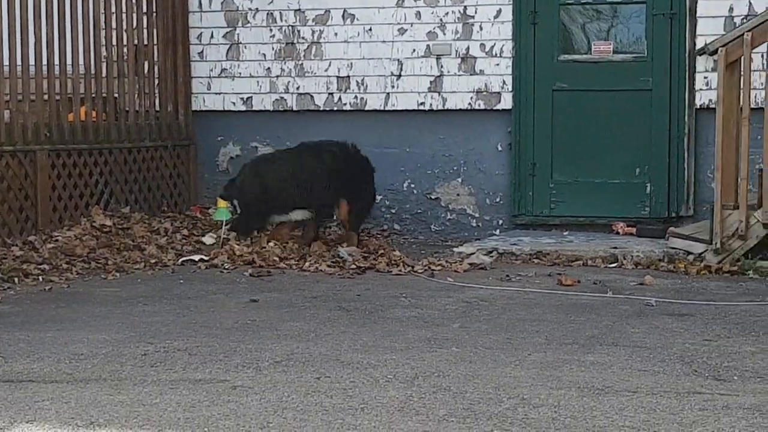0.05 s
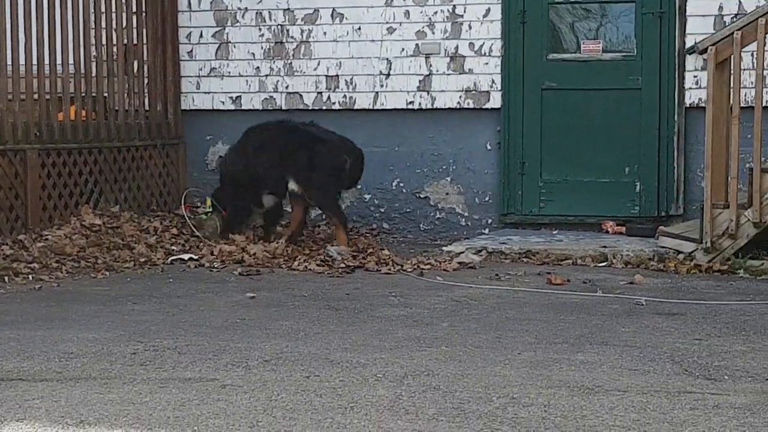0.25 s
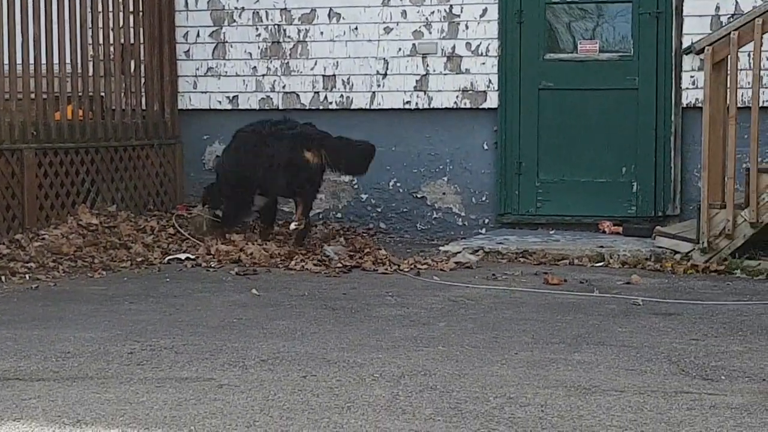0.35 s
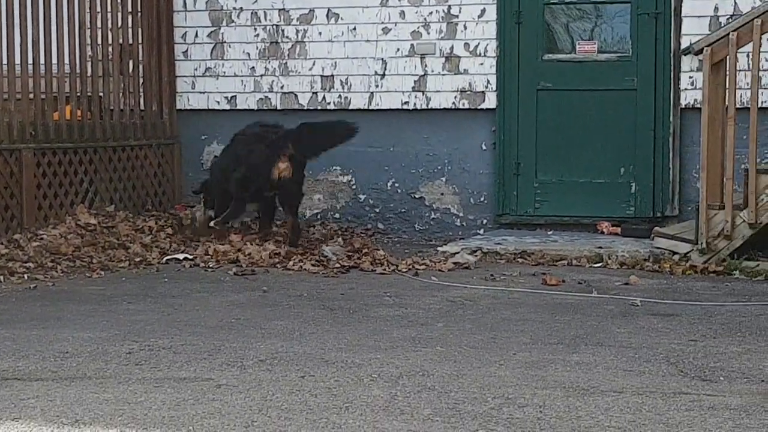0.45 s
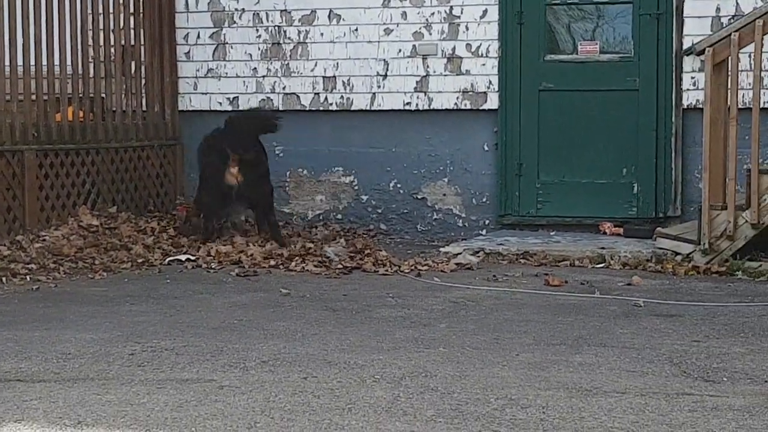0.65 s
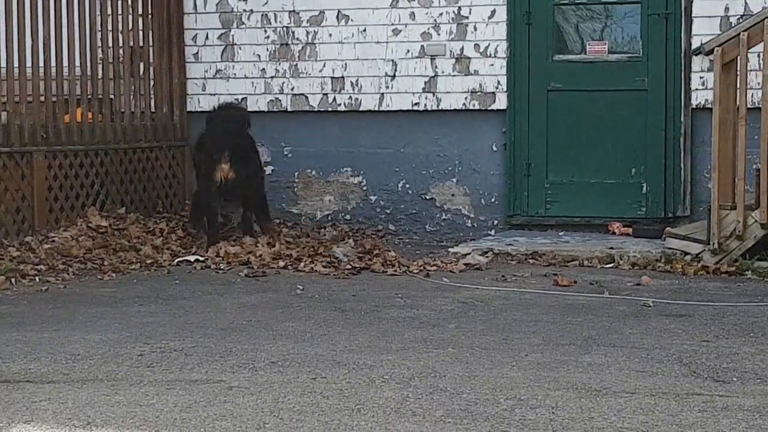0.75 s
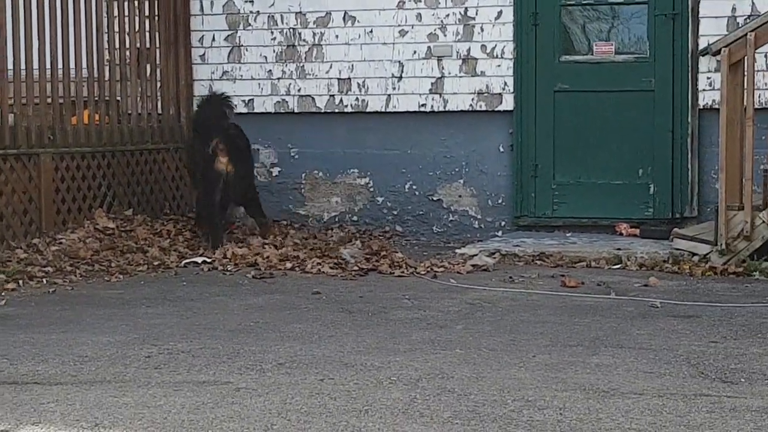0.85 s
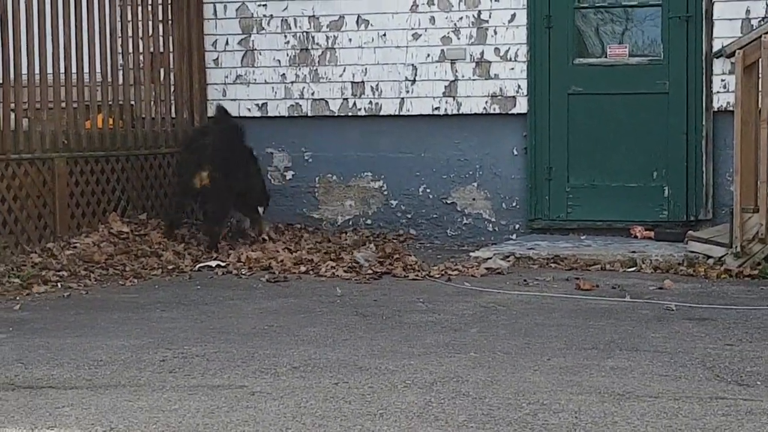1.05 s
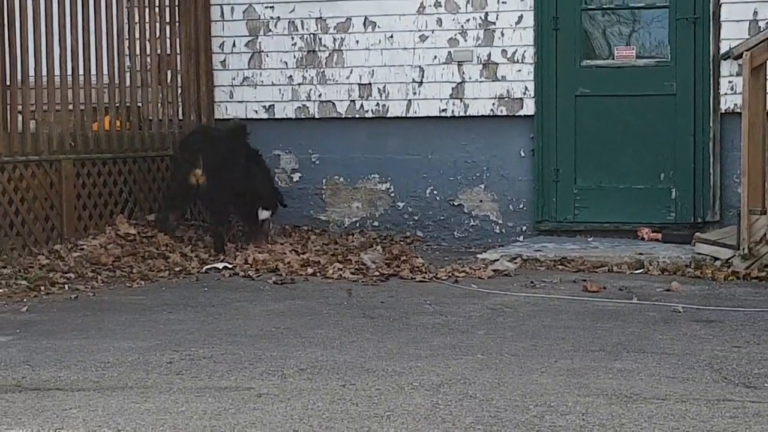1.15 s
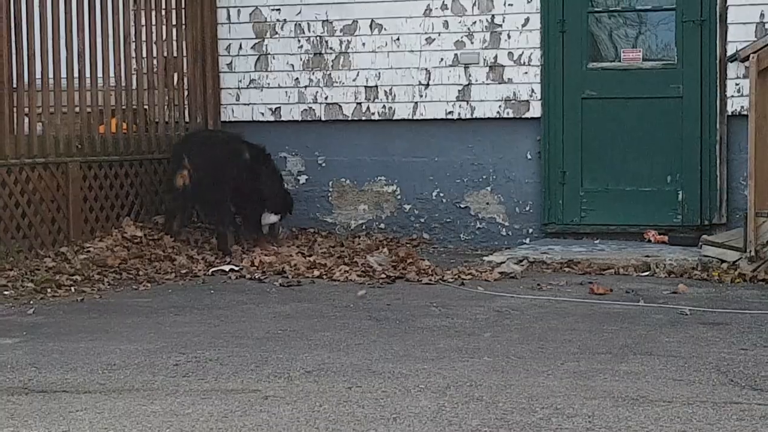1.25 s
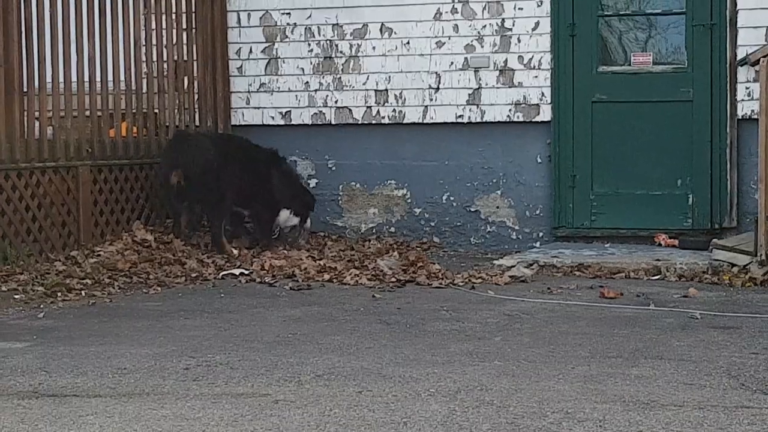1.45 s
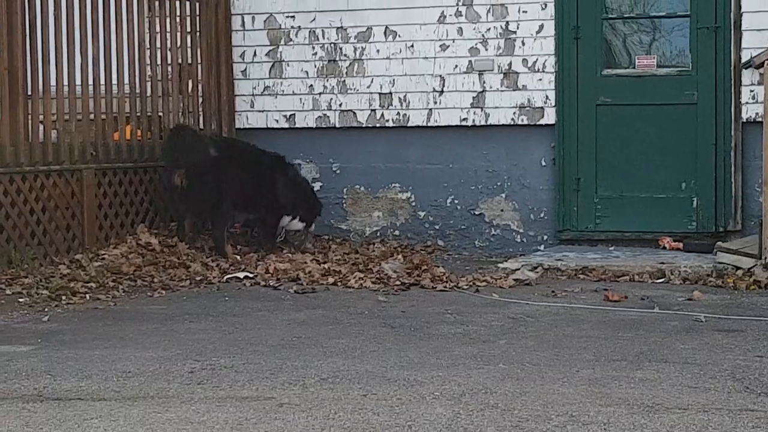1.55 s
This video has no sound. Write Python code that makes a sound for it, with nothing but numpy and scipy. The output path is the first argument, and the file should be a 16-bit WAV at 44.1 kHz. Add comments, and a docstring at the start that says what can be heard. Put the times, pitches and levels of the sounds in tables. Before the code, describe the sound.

A handled microphone bumps and scrapes up close, loudest early on, then knocks more lightly. Beneath it, dry leaves rustle softly as a dog stirs them across an outdoor yard, with a few very faint chirps and low rumble.

```python
"""Dog in dry leaves, handling knocks close by.

A dog noses through dry leaves across a paved yard: a thin, wide crackle that comes and goes.
Loudest are the dull knocks and scuffs of a hollow shell ringing in its modes, probably the
microphone housing being handled. Beneath lie a few faint chirps, low rumble and quiet outdoor air."""
import sys
import numpy as np
from scipy import signal
from scipy.io import wavfile

SR = 44100
rng = np.random.default_rng(int(sys.argv[2]) if len(sys.argv) > 2 else 0)


def generate_wav(signal):
    """Clip the signal to [-1, 1] and save it as 16-bit WAV at the path in sys.argv[1]."""
    frames = np.transpose(np.atleast_2d(signal))
    scaled = np.clip(frames, -1, 1) * 32767
    pcm = np.round(scaled).astype(np.int16)
    wavfile.write(sys.argv[1], SR, pcm)


N = 70560


def knocks():
    """Blows on the housing: each has a contact pitch, a faint bright edge and a rattle of tiny rebounds."""
    # start_s, level_db, bass_db, treble_db, rattle_db, pitch_hz, edge_db
    blows = [(0.0562, -44.5, 9, 4, 1.5, 950, -30), (.1100, -48.5, 22.5, 0, 0, 198, -30),
             (.2742, -35, 3, -23, 15, 505, -36), (.2892, -17.5, 6.5, -35, -14, 860, -40),
             (0.3081, -33, 8.5, -8, 7, 870, -44), (0.3879, -10.5, -16, -0.5, -4, 745, -37),
             (.4150, -28, 4, -9, 2, 2170, -44), (.4240, -20.5, -13, 9, -1.5, 960, -27),
             (.4493, -23.5, -11, -3, -7, 610, -44), (0.4991, -7.5, -3, -9.5, -8.5, 1900, -46),
             (0.5016, -17.5, -27, 0, 0, 950, -49), (.5703, -30.5, 26, 6, -16, 740, -32),
             (0.817, -30.5, 9.5, -5, 3, 1213, -32), (0.8221, -33, 12.5, -6, 0, 594, -26),
             (0.928, -44.5, 8, 3.5, 0, 1065, -30), (1.0393, -31.5, -23, -23, 0, 1320, -32),
             (1.075, -38, 2, 3, 4.5, 860, -30), (1.1123, -40, 3.5, -2, 2.5, 356, -32),
             (1.1420, -44.5, 12.5, -1, -3.5, 280, -30), (1.2550, -24, 1.5, 6.5, -1.5, 1264, -12.5),
             (1.2577, -22.5, -9, 8, -2.5, 1304, -25), (1.3112, -26, 4, 8, 3, 1175, -27)]
    rattle_decay_s, contact_t60_s, contact_db = 0.012, 0.016, 11
    t = np.arange(SR // 8) / SR
    out = np.zeros((2, N + SR))
    for start_s, level_db, bass_db, treble_db, rattle_db, pitch_hz, edge_db in blows:
        rattle = slips(per_s=1500, spread_db=0.65, size=len(t)) * np.exp(-t / rattle_decay_s)
        rattle /= np.linalg.norm(rattle[0])
        force = from_db(level_db) * ((t == 0) + from_db(rattle_db) * rattle)
        contact = ring(force, pitch_hz, contact_t60_s)
        contact *= 2 * np.log(1000) / (contact_t60_s * SR)  # about unit gain at resonance
        body = housing(force + from_db(contact_db) * contact, bass_db, treble_db)
        edge = from_db(edge_db) * np.sqrt(SR / 1000) * butter(force, [2500, 6000], "band", order=3)
        start = int(start_s * SR)
        out[:, start:start + len(t)] += body + edge
    return out[:, :N]


def rubbing():
    """Dense tiny slips drive the housing; the grip catches and lets go."""
    # time_s, level_db, bass_db, treble_db
    scuffs = [(0, -74, 9, 29), (.05, -62, 2, -8), (.06, -56, 1, 15.5), (.12, -57, 12, 22),
              (.17, -68, 1, 14), (.19, -56, 10, 18), (.21, -43.5, 11.5, 4), (.27, -36, 9.5, -10),
              (.322, -34.5, 19, -31), (.345, -42, 13.5, -18), (.375, -36.5, -29, -29),
              (.40, -23, -22.5, -15), (.44, -28, -2, -45), (.49, -23.5, -8, -49), (.525, -34.5, 16.5, -16),
              (.572, -30, -5.5, 0), (.605, -42.5, 2.5, -23), (.76, -56.5, 1, -12), (.97, -57.5, -13, 16.5),
              (1.09, -62, -10, 10), (1.15, -54, 20, 6.5), (1.21, -53.5, -21, 6), (1.6, -72, 8, 12)]
    level_db, bass_db, treble_db = in_time(scuffs)
    flutter_db = 1.5
    force = slips(per_s=2500, spread_db=3.5) * from_db(flutter_db * drift(rate_hz=72))
    steady_rms = np.std(housing(force[0], 0, 0))
    return housing(force * from_db(level_db), bass_db, treble_db) / steady_rms


def slips(per_s, spread_db, size=N):
    """Tiny contacts on the housing, mostly shared by both sides; rms about 1."""
    side_db = -13
    mid, side = (rms_one(grains(per_s, spread_db, size)) for _ in range(2))
    return mid + from_db(side_db) * side * [[1], [-1]]


def housing(force, bass_db, treble_db):
    """The hollow shell rings in its modes; the kind of contact favours the low or the high ones."""
    # pitch_hz, level_db, t60_s
    modes = [(151.3, -34.5, 0.087), (245, -21, 0.069), (345.7, -22, 0.083), (482, -24.5, 0.068),
             (522.4, -12.5, 0.044), (616.4, -15.5, 0.054), (703, -24, 0.076), (805, -11.5, 0.021),
             (955, -11.5, 0.017), (1155, -14.5, 0.015), (1396, -5, 0.0054), (1793, -8, 0.0094),
             (1968, -20, 0.029)]
    bass_hz, middle_hz, treble_hz = 305, 950, 1900
    treble_right_db = 2  # high modes radiate more to the right
    out = 0
    for hz, level_db, t60_s in modes:
        bass_share = at_hz([(bass_hz, 1), (middle_hz, 0)], hz)
        treble_share = at_hz([(middle_hz, 0), (treble_hz, 1)], hz)
        gain = from_db(level_db + bass_share * bass_db + treble_share * treble_db)
        pan = from_db(treble_share * treble_right_db * np.array([[-0.5], [0.5]]))
        out = out + pan * ring(force * gain, hz, t60_s)
    dull = butter(disperse(out), hz=2284, kind="low", order=8)
    return butter(dull, hz=119, kind="high")


def disperse(x, centre_hz=1040, width_hz=570):
    """A blow takes about 1 ms to spread through the shell: an all-pass delays the middle frequencies."""
    r = np.exp(-np.pi * width_hz / SR)
    a = [1, -2 * r * np.cos(2 * np.pi * centre_hz / SR), r * r]
    return signal.lfilter(a[::-1], a, x)


def leaves():
    """Stirred leaves give a hiss, a duller rustle and brittle crackles that thicken with the stirring."""
    # time_s, level_db
    stirring = [(0, -51), (.06, -53), (.125, -52), (.168, -57.5), (.29, -53.5), (.365, -60), (.395, -54),
                (.57, -56), (.62, -62), (.70, -57.5), (.80, -67.5), (.88, -60), (.98, -59), (1.15, -62),
                (1.255, -56.5), (1.34, -60.5), (1.44, -69), (1.6, -63.5)]
    # freq_hz, density_db
    hiss_spectrum = [(1000, -26), (2050, 15), (2800, 6), (3450, 3.5), (4150, -24), (4900, 1), (6300, 0.5),
                     (7600, -13), (8500, 1), (10000, -12), (12200, -0.5), (16500, -4.5)]
    # freq_hz, density_db
    rustle_spectrum = [(150, 8), (400, -0.5), (800, 1.5), (1400, 4), (2050, 0.5), (2700, -19.5), (4000, 8)]
    hiss_over_crackle_db = 3.5
    stir_db, = in_time(stirring)
    swing_db = stir_db - stir_db.mean()
    rustle_db = -49.5 + 0.47 * swing_db
    crackle = crackles(per_s=1000 * from_db(swing_db / 2))
    hiss = from_db(hiss_over_crackle_db) * banded_noise(hiss_spectrum, flicker_db=2.2, bands=22)
    rustle = from_db(rustle_db) * banded_noise(rustle_spectrum, flicker_db=2.4, bands=13)
    return from_db(stir_db) * (crackle + hiss) + rustle


def crackles(per_s, t60_cycles=3.5):
    """Brittle leaves snap, each ringing for a few cycles at a random high pitch; rms 1."""
    snaps = np.array([grains(per_s, spread_db=1) for _ in range(2)])
    pitches_hz = np.geomspace(5000, 14500, 12)
    pitch_index = rng.integers(0, len(pitches_hz), N)
    rings = (ring(snaps * (pitch_index == k), hz, t60_cycles / hz) for k, hz in enumerate(pitches_hz))
    return rms_one(sum(rings))


def chirps():
    """Thin wavering whistles that swell and fade, perhaps a small far bird."""
    # start_s, length_s, level_db
    calls = [(0.271, 0.013, -49.5), (.458, 0.036, -54), (.788, 0.031, -69), (0.859, 0.023, -58.5),
             (1.165, 0.02, -62.5)]
    t = np.arange(N) / SR
    envelope = 0
    for start_s, length_s, level_db in calls:
        progress = np.clip((t - start_s) / length_s, 0, 1)
        envelope += from_db(level_db) * np.sqrt(np.abs(np.sin(np.pi * progress)))
    pitch_hz = 7010 + 59 * drift(rate_hz=145)
    return envelope * np.sin(2 * np.pi * np.cumsum(pitch_hz) / SR)


def rumble(gain_db=2):
    """Uneven low rumble on the microphone."""
    # time_s, level_db
    swells = [(0, -47), (.045, -54), (.065, -39), (.125, -45.5), (.185, -44), (.215, -48), (.275, -42),
              (.32, -48), (.385, -63), (.48, -51.5), (.62, -51.5), (.77, -58.5), (.84, -45.5), (.94, -56),
              (1.08, -60.5), (1.17, -53.5), (1.22, -62), (1.6, -59.5)]
    # freq_hz, density_db
    spectrum = [(25, -20), (50, -9), (90, -1), (140, -8), (250, -13.5), (500, -24.5), (1500, -54)]
    level_db, = in_time(swells)
    return from_db(level_db + gain_db) * banded_noise(spectrum, flicker_db=2.5, bands=8)


def outdoor_air(level_db=-60.5):
    """Quiet, dull noise whose bands flicker."""
    # freq_hz, density_db
    spectrum = [(30, 27), (100, -5), (300, 10), (900, 8), (2000, -21.5), (3000, -20), (15000, -13)]
    return from_db(level_db) * banded_noise(spectrum, flicker_db=5.5, bands=14)


def banded_noise(spectrum, flicker_db, bands):
    """Stereo noise in bands, each with its own level, flicker and width; rms 1."""
    # freq_hz, left_right_correlation
    likeness = [(40, 0.3), (100, 0.4), (250, .7), (1000, 0.23), (2000, .7), (3500, -0.8), (7000, 0.87),
                (14000, -0.23)]
    edges_hz = np.geomspace(spectrum[0][0], spectrum[-1][0], bands + 1)
    white = rng.standard_normal((2, 2, N))
    out = 0
    for k, (low_hz, high_hz) in enumerate(zip(edges_hz, edges_hz[1:])):
        mid, side = butter(white[k % 2], [low_hz, high_hz], "band", order=3)
        centre_hz = np.sqrt(low_hz * high_hz)
        alike = at_hz(likeness, centre_hz)
        gain = from_db(at_hz(spectrum, centre_hz) + flicker_db * drift(rate_hz=14.6))
        out = out + gain * (np.sqrt(1 + alike) * mid + np.sqrt(1 - alike) * side * [[1], [-1]])
    return rms_one(out)


def grains(per_s, spread_db, size=N):
    """Random clicks of uneven size and sign."""
    heights = from_db(spread_db * np.minimum(rng.exponential(1, size), 4))
    signs = rng.choice([-1, 1], size)
    return heights * signs * (rng.random(size) < per_s / SR)


def ring(clicks, hz, t60_s):
    """A unit click starts a damped cosine of height 1."""
    r, w = from_db(-60 / (t60_s * SR)), 2 * np.pi * hz / SR
    return signal.lfilter([1, -r * np.cos(w)], [1, -2 * r * np.cos(w), r * r], clicks + 1e-18)


def drift(rate_hz):
    """Smooth random wander; rms about 1."""
    hop, settle = 40, 2000
    r = np.exp(-2 * np.pi * rate_hz * hop / SR)
    white = rng.standard_normal(N // hop + settle + 2)
    slow = signal.lfilter([1], [1, -2 * r, r * r], white)[settle:]
    return np.interp(np.arange(N) / hop, np.arange(len(slow)), rms_one(slow))


def butter(x, hz, kind, order=2):
    """Causal Butterworth filter."""
    return signal.sosfilt(signal.butter(order, hz, kind, fs=SR, output="sos"), x + 1e-18)


def in_time(rows):
    """Each column of a curve at every sample."""
    time_s, *columns = np.transpose(rows)
    return [np.interp(np.arange(N) / SR, time_s, column) for column in columns]


def at_hz(points, hz):
    """Read a curve on a log-frequency axis."""
    freq_hz, values = np.transpose(points)
    return np.interp(np.log(hz), np.log(freq_hz), values)


def from_db(db):
    """Decibels to gain."""
    return 10 ** (np.asarray(db) / 20)


def rms_one(x):
    """Scale to unit rms."""
    return x / np.sqrt(np.mean(x ** 2) + 1e-20)


def scene():
    """Close knocks and scuffs in the centre, leaves and air all around."""
    return knocks() + rubbing() + leaves() + chirps() + rumble() + outdoor_air()


def record(dry):
    """Steep low-pass on the top treble."""
    cutoff_hz = 15900
    return signal.sosfilt(signal.ellip(12, 0.1, 85, cutoff_hz, fs=SR, output="sos"), dry)


dry = scene()
out = record(dry)
generate_wav(out)
```